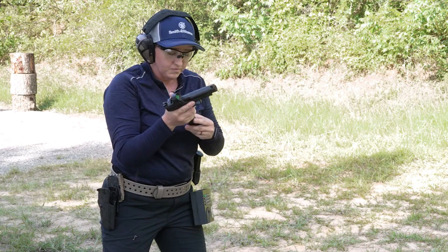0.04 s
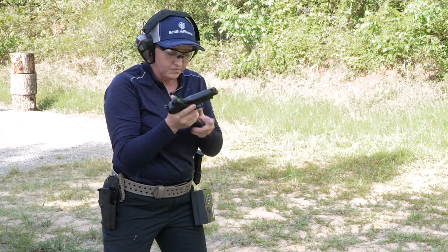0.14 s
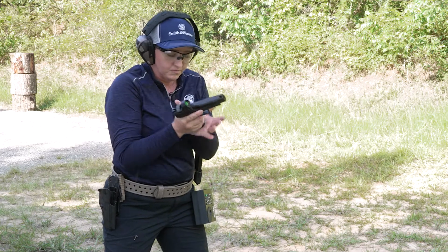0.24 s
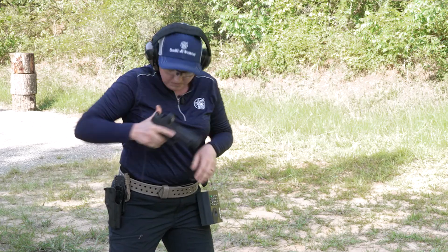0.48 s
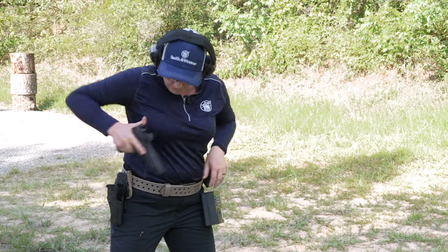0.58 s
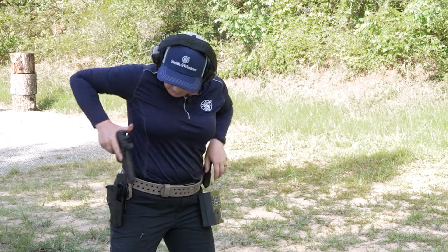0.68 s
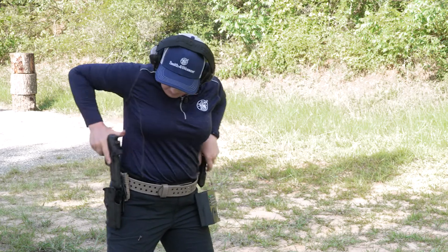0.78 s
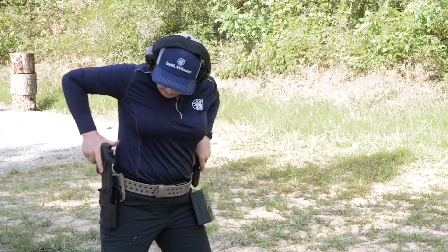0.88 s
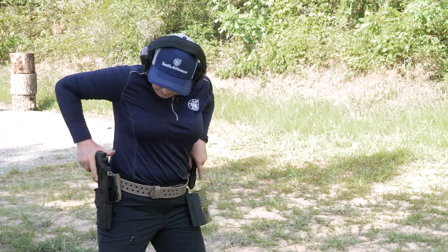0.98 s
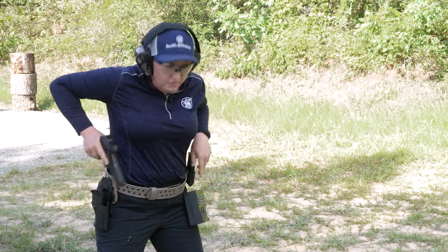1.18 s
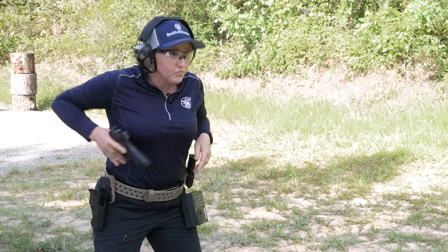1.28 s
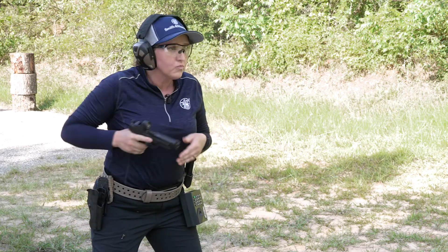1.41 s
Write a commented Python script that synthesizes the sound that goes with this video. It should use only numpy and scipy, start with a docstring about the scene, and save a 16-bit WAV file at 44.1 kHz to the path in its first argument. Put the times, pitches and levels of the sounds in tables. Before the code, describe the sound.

Sharp metallic double clack of a magazine seated in a pistol, then quieter hard-plastic holster clicks and scrapes

```python
"""Pistol loaded and holstered

Outdoors, close to a small microphone: a magazine rattles up a pistol grip and is slapped home, with a few
light ticks after, then the pistol goes into a hard plastic holster and comes out again. Taps and gritty
pushes ring damped modes; rubbing feeds uneven grit through such modes. Decaying sines make a small steel
part ring very high. Shaped noise makes a soft brush, rustling cloth, light wind, far insects and air."""
import sys
import numpy as np
from scipy import signal
from scipy.fft import rfft, irfft
from scipy.io import wavfile
from scipy.ndimage import uniform_filter1d

SR = 44100
rng = np.random.default_rng(int(sys.argv[2]) if len(sys.argv) > 2 else 0)


def to_wav(sig):
    """Store sig (one row per channel, or 1-D mono) as 16-bit WAV at the path in sys.argv[1].

    Samples outside -1..1 are clipped; the rate is SR.
    """
    pcm = np.clip(np.atleast_2d(sig), -1, 1) * 32767
    pcm = np.round(pcm).astype(np.int16)
    wavfile.write(sys.argv[1], SR, pcm.T)  # frames by channels


N = 63945  # length in samples

# Contacts: t/s, peak level/dB, favoured pitch f/Hz, treble mode gain/dB, decay of the grit/s
# light ticks and rattles, before and just after the magazine is slapped home
LIGHT_CONTACTS = [(.0365, -37, 2600, -33, 0.00056), (.0638, -34, 1140, -45, 0.0017),
                  (.0665, -38, 2220, -41, 0.0018), (.101, -32.5, 1770, -30, 0.00057),
                  (.126, -38.5, 2150, -24, 0.0016), (.1435, -34.5, 1120, -28, 0.003),
                  (.153, -33, 2620, -22, 0.0024), (.1685, -33, 2640, -30, 0.0013),
                  (.1925, -33, 1117, -8.5, 0.0045), (.2073, -19, 1928, -11.5, 0.0012),
                  (.2145, -31, 2310, -0.5, 0.0013), (.289, -41, 2920, -2.5, .002),
                  (.316, -48, 1090, -24, 0.0011), (.347, -36.5, 2040, -19, 0.00076),
                  (.359, -38, 1950, -3, 0.0019)]
# magazine slapped home and latch bouncing
SEATING_CONTACTS = [(.2343, -14, 2350, -2.5, 0.0064), (.2405, -16, 1900, -6.5, 0.0012),
                    (.2513, -3.5, 5194, -3, 0.0019), (.2568, -0.5, 3280, -5, 0.00098),
                    (.262, -18, 1920, -3, 0.0044), (.2685, -17, 2300, -15, 0.0023)]
# pistol knocking the holster
HOLSTER_CONTACTS = [(.743, -53.5, 810, -26, 0.0031), (.827, -41.5, 5300, 4.5, 0.0014),
                    (.879, -27.5, 1250, 4, 0.0019), (.883, -24, 1560, 9, 0.0039),
                    (.893, -32.5, 2160, 13, 0.0042), (.917, -30.5, 3330, 10.5, 0.001),
                    (.936, -37, 1450, 3, .003), (.949, -37.5, 1630, -17, 0.0037),
                    (.973, -37.5, 1890, -7, 0.004), (.976, -35.5, 560, -10, 0.0026),
                    (.987, -42.5, 5720, 8.5, 0.004), (.998, -39, 8100, 3.5, 0.00059),
                    (1.0575, -32.5, 3400, 2, 0.0014), (1.063, -26, 1530, 4, 0.0027),
                    (1.066, -32.5, 810, -3.5, 0.0042), (1.088, -36.5, 2140, 1, 0.0025),
                    (1.1115, -28, 3170, 5, 0.0021), (1.1225, -33.5, 2224, 8.5, 0.0018),
                    (1.132, -37.5, 1860, 9, 0.0048), (1.151, -43, 4150, -4, 0.003)]

# Modes of each body: f/Hz, level/dB
MAGAZINE_MODES = [(330, -15), (800, -4.5), (1120, -2), (1920, -3), (2350, -2), (2900, -7.5), (4100, -18.5),
                  (5200, -12.5), (7000, -16), (11000, -17)]
PISTOL_MODES = [(90, -20), (280, -13), (620, -8.5), (1100, -7), (1900, -2), (2850, -2.5), (3400, -5),
                (5040, -5.5), (5870, -7), (7800, -2.5), (10900, -5.5), (13800, -13)]
HOLSTER_MODES = [(130, -17), (320, -7.5), (520, -7.5), (810, -3.5), (1250, 0), (1550, -1.5), (2100, -0.5),
                 (3200, -8.5), (4600, -11), (6000, -11.5), (7740, -13), (10300, -20)]

# Strikes on the steel part: t/s, lower ring level/dB, upper ring level/dB
STEEL_STRIKES = [(0.884, -34.5, -39), (0.987, -53, -45.5), (1.071, -42, -59), (1.1, -48, -46),
                 (1.137, -48.5, -58)]
# Its two rings: f/Hz, time to fall 60 dB/s
STEEL_RINGS = [(14050, 0.057), (14730, 0.077)]

# Level curves: t/s, level/dB
# rubbing around the loading
SLIDE_LEVELS = [(.09, -104), (.135, -57.5), (.2, -58.5), (.275, -54), (.32, -84.5)]
# pistol dragging along the holster
DRAG_LEVELS = [(.87, -94), (.885, -44.5), (.91, -61.5), (.99, -56), (1.03, -83), (1.07, -53), (1.12, -60),
               (1.22, -77)]
# cloth rustling
RUSTLE_LEVELS = [(.12, -75.5), (.27, -57.5), (.38, -66), (.45, -78.5), (.62, -76), (.7, -65.5),
                 (.77, -78.5), (.83, -66.5), (1.3, -76)]
# wind puffing on the microphone
WIND_LEVELS = [(.22, -64), (.29, -65.5), (.45, -89.5), (.58, -58.5), (.66, -74), (.77, -69.5), (1.05, -73),
               (1.2, -69.5)]

# Noise colours: f/Hz, level/dB
# cloth
CLOTH_COLOUR = [(300, -18.5), (1000, -5), (2000, -6), (6000, -13.5), (15000, -24.5)]
# open air
AIR_COLOUR = [(30, -1.5), (300, -5), (1000, -15.5), (2500, -26), (5000, -37), (11000, -30), (16500, -46)]

# Mode width: fixed part/Hz, share of the mode's pitch
MAGAZINE_WIDTH = (22, .09)
PISTOL_WIDTH = (94, 0.084)
HOLSTER_WIDTH = (130, 0.12)

TREBLE_HZ = 4500
FAVOUR_DB, FAVOUR_OCT = 8.5, 0.19  # lift around the favoured pitch, and its reach
THIN_DB_PER_OCT = -1  # thinning of modes below the favoured pitch
RISE_S, TAP_DB = 0.0002, 9.5  # rise of the grit; level of the clean first tap
BUMP_S, BUMP_SPREAD_S, BUMP_DB = 0.659, 0.018, -60.5
BUMP_HZ, BUMP_WIDTH_HZ = 560, 400
WIND_HZ = 60
INSECT_HZ, INSECT_WIDTH_HZ, INSECT_DB = 8450, 470, -84.5
AIR_DB = -67
TOP_HZ = 16500  # top of the recorder's range


def load_magazine():
    """The magazine's modes ring for the light contacts and the rubbing, the pistol's for the slap home."""
    magazine = with_widths(MAGAZINE_MODES, MAGAZINE_WIDTH)
    pistol = with_widths(PISTOL_MODES, PISTOL_WIDTH)
    light = knocks(LIGHT_CONTACTS, magazine)
    seating = knocks(SEATING_CONTACTS, pistol)
    slide = rubbing(SLIDE_LEVELS, magazine[:5], rate=160)  # lower modes only
    return light + seating + slide


def holster_pistol():
    """Knocks and dragging both ring the modes of the hard plastic shell."""
    shell = with_widths(HOLSTER_MODES, HOLSTER_WIDTH)
    return knocks(HOLSTER_CONTACTS, shell) + rubbing(DRAG_LEVELS, shell, rate=290)


def knocks(contacts, modes):
    """Each contact is a clean tap and a short gritty push that ring the modes."""
    out, size = np.zeros(N), 4096
    t = np.arange(size) / SR
    grits = rng.standard_normal((len(contacts), size))
    for (start, level_db, favoured_hz, treble_db, decay), grit in zip(contacts, grits):
        envelope = np.exp(-t / max(decay, 1 / SR)) * (1 - np.exp(-t / RISE_S))
        tap = undb(TAP_DB) * (t == 0)
        push = grit * envelope + tap
        sound = 0
        for k, (hz, width, mode_db) in enumerate(modes):
            octaves = np.log2(hz / favoured_hz)
            favour = FAVOUR_DB * np.exp(-(octaves / FAVOUR_OCT) ** 2)
            thinning = THIN_DB_PER_OCT * np.clip(-octaves, 0, 2)
            treble = treble_db * (hz > TREBLE_HZ)
            gain = undb(mode_db + favour + thinning + treble)
            sign = (-1) ** k  # neighbouring modes in opposite polarity
            sound = sound + sign * gain * ring(push, hz, width)
        i = int(start * SR)
        out[i:i + size] += undb(level_db) * sound / np.abs(sound).max()
    return out


def rubbing(levels, modes, rate):
    """Grit of uneven grain and wandering strength drives the modes of a body."""
    grit = grains(2.2)
    grit = grit * undb(1.7 * walk(rate))
    body = sum(undb(db) * ring(grit, hz, width) for hz, width, db in modes)
    return curve(levels) * unit(body)


def steel():
    """A small steel part rings at two very high pitches, dying exponentially after each strike."""
    out, t = np.zeros(N), np.arange(N) / SR
    phases = rng.random((len(STEEL_STRIKES), 2))  # in turns
    for (start, *levels), pair in zip(STEEL_STRIKES, phases):
        since = np.maximum(t - start, 0)
        for db, (hz, t60), phase in zip(levels, STEEL_RINGS, pair):
            fade = undb(db - 60 * since / t60) * (t > start)
            out += fade * np.sin(2 * np.pi * (hz * since + phase))
    return out


def bump():
    """A soft dull brush against the belt: a short swell of low band noise."""
    swell = np.exp(-((np.arange(N) / SR - BUMP_S) / BUMP_SPREAD_S) ** 2)
    noise = ring(rng.standard_normal(N), BUMP_HZ, BUMP_WIDTH_HZ)
    noise = ring(noise, BUMP_HZ, BUMP_WIDTH_HZ)
    return undb(BUMP_DB) * swell * unit(noise)


def cloth():
    """Rustling: coloured grains whose strength flutters under a level curve."""
    flutter = undb(2.5 * walk(68))
    return curve(RUSTLE_LEVELS) * flutter * coloured(grains(0.7), CLOTH_COLOUR)


def wind():
    """Light puffs on the microphone: deep noise through two resonances, swelling and sinking."""
    rumble = ring(rng.standard_normal(N), WIND_HZ, 60)
    return curve(WIND_LEVELS) * unit(ring(rumble, WIND_HZ, 98))


def insects():
    """Far hiss: a high band of noise, gently wavering."""
    hiss = ring(rng.standard_normal(N), INSECT_HZ, INSECT_WIDTH_HZ)
    hiss = ring(hiss, INSECT_HZ, INSECT_WIDTH_HZ)
    return undb(INSECT_DB + 1.7 * walk(20)) * unit(hiss)


def air():
    """Steady coloured noise of the open air."""
    return undb(AIR_DB) * coloured(rng.standard_normal(N), AIR_COLOUR)


def with_widths(modes, damping):
    """(f/Hz, width/Hz, level/dB): higher modes are wider, so they die faster."""
    fixed, share = damping
    return [(hz, fixed + share * hz, db) for hz, db in modes]


def ring(x, hz, width):
    """One damped mode, gain near 1 at its centre."""
    r = np.exp(-np.pi * width / SR)
    poles = [1, -2 * r * np.cos(2 * np.pi * hz / SR), r * r]
    return signal.lfilter([1 - r, 0, r - 1], poles, x)


def grains(scatter_db):
    """Noise whose grains differ in size."""
    return unit(rng.standard_normal(N) * undb(scatter_db * rng.exponential(size=N)))


def walk(rate):
    """Slow random drift, rms 1: noise averaged twice over 1/rate seconds."""
    k = int(SR / rate)
    return unit(uniform_filter1d(uniform_filter1d(rng.standard_normal(N), k), k))


def coloured(x, points):
    """Noise shaped by (f/Hz, level/dB) points, rms 1."""
    points = np.array(points)
    hz = np.maximum(np.arange(N // 2 + 1) * SR / N, 1)
    gain_db = np.interp(np.log(hz), np.log(points[:, 0]), points[:, 1])
    return unit(irfft(rfft(x) * undb(gain_db), N))


def curve(rows):
    """Gain over time from (t/s, level/dB) rows."""
    rows = np.array(rows)
    return undb(np.interp(np.arange(N) / SR, rows[:, 0], rows[:, 1]))


def unit(x):
    """Scale to rms 1."""
    return x / np.sqrt(np.mean(x ** 2))


def undb(db):
    """Decibels to amplitude."""
    return 10 ** (np.asarray(db) / 20)


def scene():
    """Mix the handling sounds over the outdoor bed, in one channel."""
    handling = load_magazine() + holster_pistol() + steel() + bump()
    background = cloth() + wind() + insects() + air()
    return (handling + background)[None]


def record(dry):
    """The recorder cuts the top with a steep low-pass."""
    low_pass = signal.ellip(10, 0.2, 80, TOP_HZ, fs=SR, output="sos")
    return signal.sosfilt(low_pass, dry)


dry = scene()
out = record(dry)
to_wav(out)
```